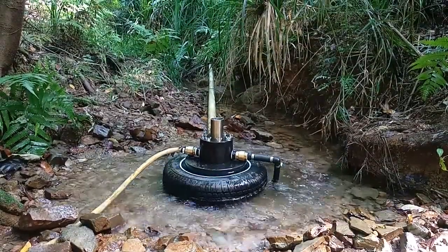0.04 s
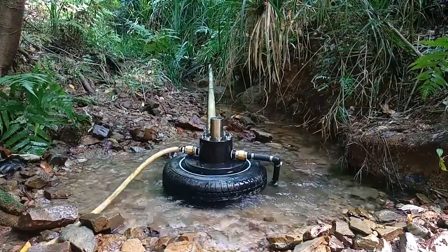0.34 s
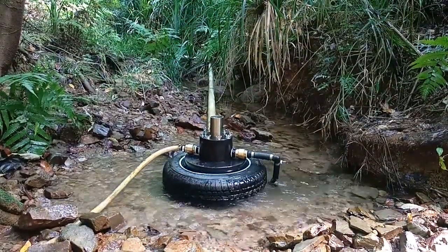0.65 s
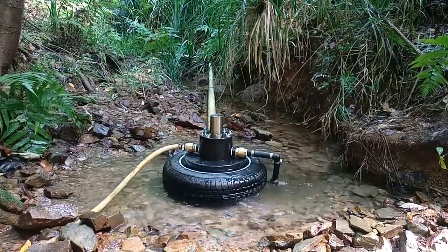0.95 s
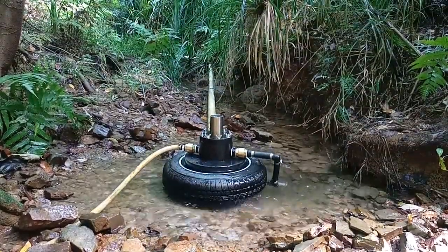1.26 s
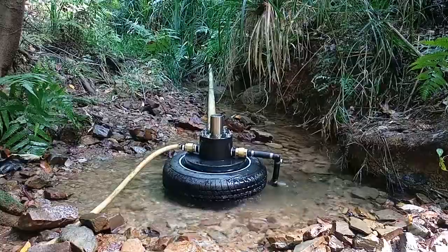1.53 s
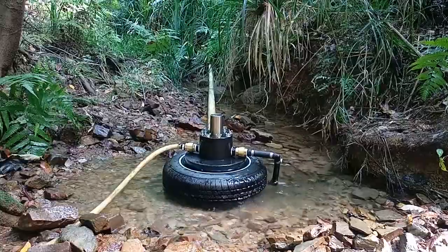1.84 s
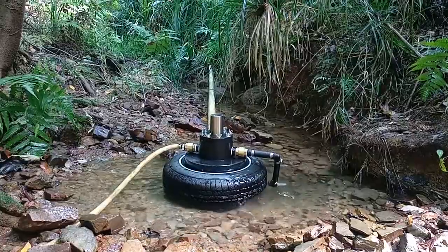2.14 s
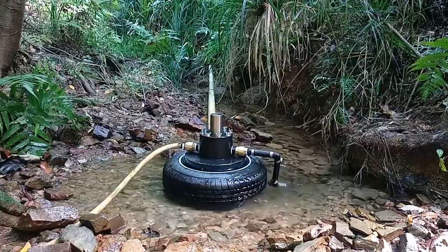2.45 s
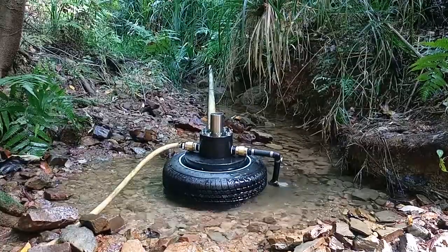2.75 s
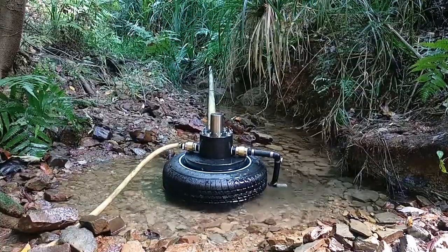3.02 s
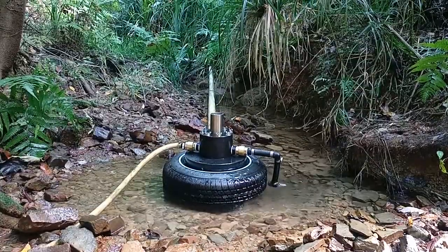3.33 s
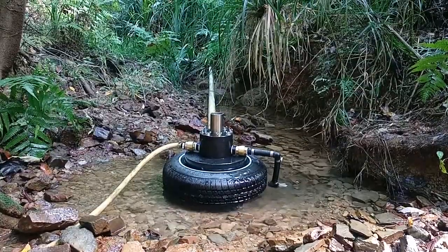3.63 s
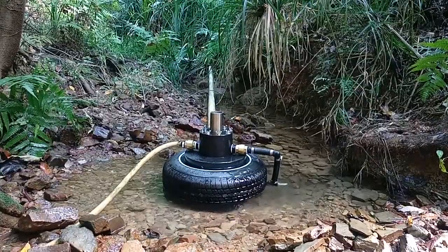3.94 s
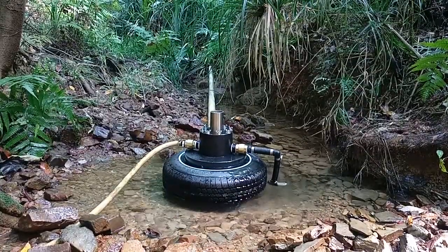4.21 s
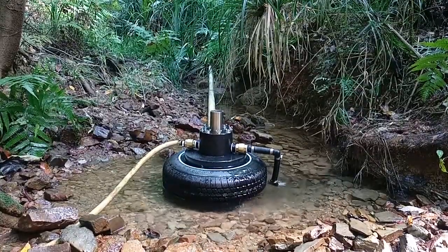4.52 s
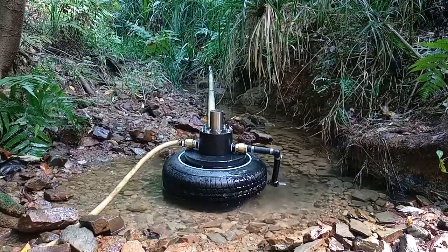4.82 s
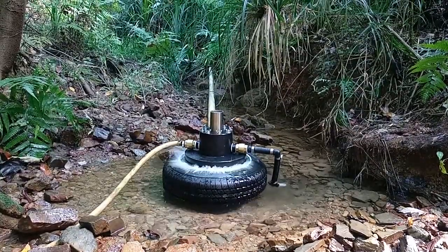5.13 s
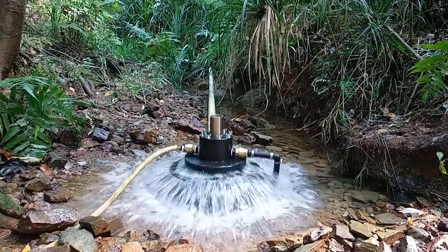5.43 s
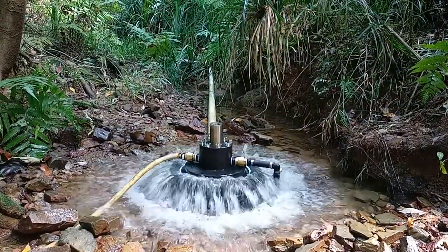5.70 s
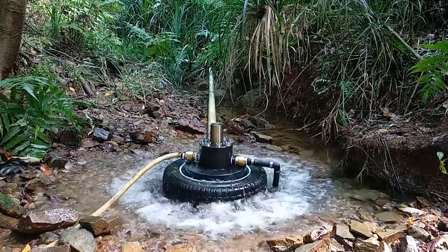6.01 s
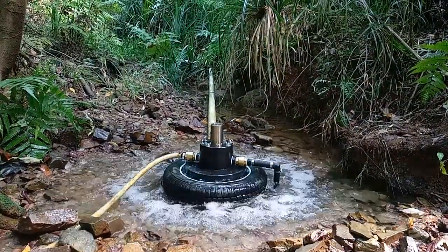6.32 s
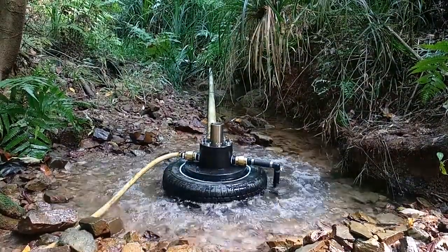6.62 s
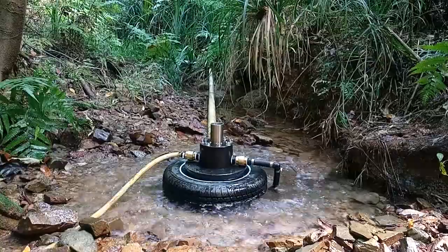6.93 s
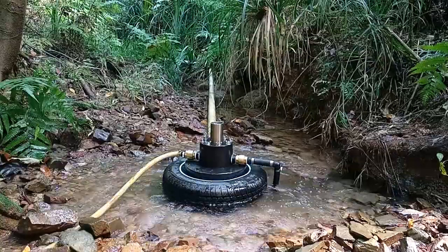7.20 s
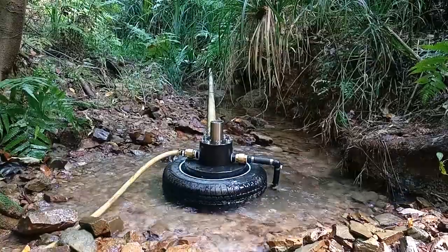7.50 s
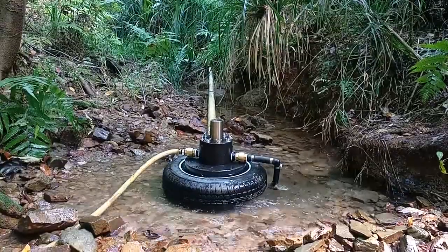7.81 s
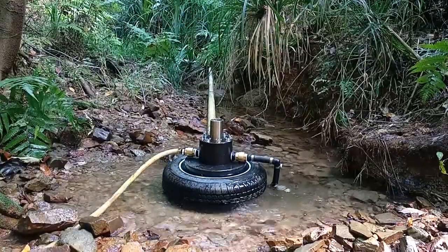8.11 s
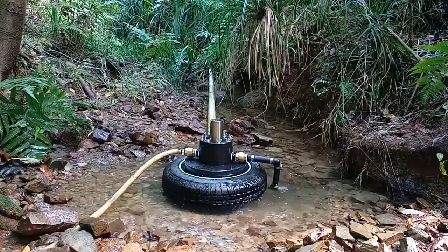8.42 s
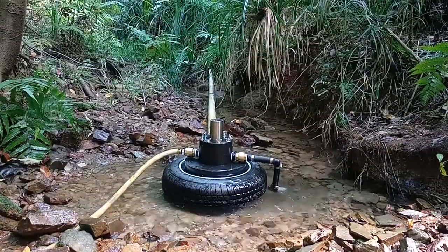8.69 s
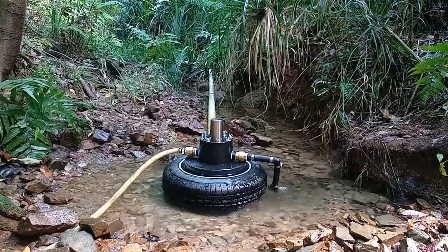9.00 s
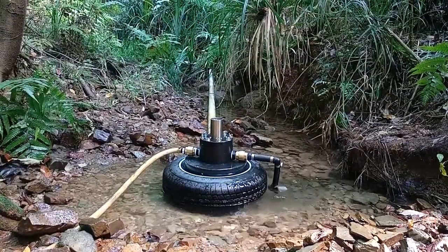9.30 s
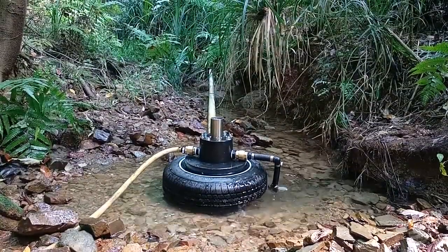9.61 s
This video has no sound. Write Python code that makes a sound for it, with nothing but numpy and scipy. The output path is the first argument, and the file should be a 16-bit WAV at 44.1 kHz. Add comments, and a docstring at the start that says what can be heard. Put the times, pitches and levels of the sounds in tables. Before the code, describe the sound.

A shallow forest creek trickles and gurgles softly, a little to the right, with small drips ticking close by. A faint, high cicada buzz fades in. About halfway through, a water-driven pump suddenly releases a loud rush of water that splashes into a pool for under a second. Bubbles and fizzing foam die away, leaving the trickle and two faint cicadas.

```python
"""Water-driven tyre pump in a forest creek

The valve opens once: a sheet of water bursts out, plunges into the pool, leaves fizzing foam.
Trapped air rings as rising sine tones; impacts and spray are shaped noise.
The shallow creek gurgles off to the right, drips tick close by, the banks echo.
Two cicadas start one after the other: pulsed noise through a body resonance."""
import sys
import numpy as np
from scipy import signal
from scipy.fft import rfft, irfft, next_fast_len
from scipy.io import wavfile
from scipy.ndimage import uniform_filter1d

SR = 44100
rng = np.random.default_rng(int(sys.argv[2]) if len(sys.argv) > 2 else 0)


def persist_wave(psi):
    """Save psi, clipped to +-1, as 16-bit WAV."""
    counts = np.round(np.clip(psi, -1, 1) * 32767).astype(np.int16)
    wavfile.write(sys.argv[1], SR, np.atleast_2d(counts).T)


N = 429975
TIME_S = np.arange(N) / SR
LEAK_S, OPEN_S, LAND_S, SHUT_S = 5.11, 5.209, 5.335, 5.99  # valve leaks, opens; sheet lands; valve shuts

# noise spectra: f/Hz, relative density/dB
SPLASH_SPECTRUM = [(300, -27.5), (480, -2), (580, -7.5), (740, -3), (980, -1), (1150, -3.5), (1390, -3),
                   (1680, -3), (1980, 0), (2900, -6.5), (3900, -5.5), (5800, -7.5), (6550, -5),
                   (8100, -22.5), (11000, -32)]
SPRAY_SPECTRUM = [(6000, -34), (8000, 2), (10000, 8.5), (13800, 6.5), (14800, 16), (16000, 3)]
CHURN_SPECTRUM = [(25, -26), (60, -41), (110, -14.5), (170, -6.5), (230, -1.5), (270, -2.5), (315, 3.5),
                  (400, -4.5), (485, 3), (560, -9.5), (900, -29)]
FOAM_SPECTRUM = [(600, -18), (1500, 5.5), (2500, -2), (4000, 0.5), (6600, 3), (8000, -13), (10500, -8),
                 (13800, -10.5), (15000, -2.5)]
WASH_SPECTRUM = [(25, -26), (90, -4.5), (220, -8), (330, -5.5), (450, -14), (620, -4.5), (1100, 5.5),
                 (1900, 2.5), (2800, -4.5), (5000, -4), (6800, 1.5), (8000, -18.5), (13800, -27),
                 (15200, -15.5)]
# stereo balance: f/Hz, L-R/dB
PUMP_PAN = [(200, -0.5), (1300, 1.5), (1700, 0), (2400, 3), (3500, 3), (4300, 0), (6800, -3), (8500, -1),
            (10500, 9.5), (15000, 7)]
CREEK_PAN = [(200, 0), (700, -6), (1200, 0), (1700, -8.5), (2900, 0), (4100, -8.5), (5800, -9),
             (7000, -16.5), (9000, -3), (12500, 8.5), (15000, 1)]
# stereo likeness: f/Hz, L-R correlation
PUMP_CORRELATION = [(60, 0.79), (200, 0.99), (700, 0.72), (1400, 0.36), (2000, 0.06), (2700, -0.57),
                    (4000, 0.074), (8000, -0.13)]
CREEK_CORRELATION = [(60, 0.12), (200, 0.24), (450, 0.42), (1000, 0.22), (1500, 1), (2200, 0.039),
                     (5000, 0.042)]
# surges of the sheet: t/s, splash gain/dB, churn gain/dB, half-length/s
SHEET_SURGES = [(5.36, -0.5, 7, .042), (5.434, 4.5, -7, 0.03), (5.787, -1, 6.5, 0.027)]
# big air pockets dragged under: t/s, relative level/dB, f/Hz, t60/s
AIR_POCKETS = [(5.313, -29, 400, 0.082), (5.332, -26, 324, 0.16), (5.352, -24, 494, 0.059),
               (5.36, -41.5, 82, 0.26), (5.382, -25, 310, 0.084), (5.392, -27, 196, 0.092),
               (5.574, -26.5, 228, 0.32), (5.775, -35, 109, 0.039)]
# water lumps hitting the pool: t/s, relative level/dB, f/Hz
LUMP_SLAPS = [(5.213, -29, 1090), (5.2773, -19.5, 3400), (5.3146, -13, 2230), (5.332, -13.5, 3770),
              (5.3428, -12, 3830), (5.389, -19.5, 1860), (5.5465, -20, 1380), (5.843, -15, 2100),
              (5.872, -20, 1360)]
# froth of the previous stroke and this one: formed/s, level/dB, thins from/s, decay/(dB/s)
FROTH_STAGES = [(0, -56, 0.5, 57), (6.0, -49, 6.38, 8.5)]
# creek bubble and droplet strength: f/Hz, relative level/dB
BUBBLE_LEVELS = [(560, 3.5), (700, -7), (1050, 1), (1900, 5), (2800, 3.5), (4500, -13), (6500, -13),
                 (7500, -14.5)]
DROPLET_LEVELS = [(2500, -6.5), (4500, 2), (6700, 6), (8000, -23), (13800, -0.5), (15000, -29)]
# loudest bubbles (the creek's, and the pool's after the discharge), close drips: t/s, relative level/dB, f/Hz,
# L-R/dB
LOUD_PLOPS = [(0.089, -38.5, 1910, -7), (0.435, -45, 1900, 14), (1.23, -46, 896, -4),
              (1.925, -49.5, 800, 2), (2.209, -45.5, 964, -5), (2.536, -41, 1790, -5),
              (2.621, -41, 1600, -5), (2.954, -37, 1980, -0.5), (3.138, -45, 1080, -7),
              (3.439, -50, 654, -4), (3.482, -39.5, 1860, -6), (3.992, -40.5, 987, -1),
              (4.018, -38, 1710, -7), (4.584, -40, 1485, 0), (6.093, -33, 1410, 19), (6.22, -32.5, 3480, 6),
              (6.255, -37, 2000, 0), (6.701, -36.5, 2390, 0), (6.92, -38.5, 2320, 2),
              (7.91, -45.5, 707, -4), (8.028, -40.5, 780, -5), (8.873, -42, 2200, 1),
              (9.192, -39.5, 1050, -5), (9.237, -46, 633, -2.5), (9.288, -36.5, 3420, 8),
              (9.56, -41, 1970, 1)]
CLOSE_DRIPS = [(.3047, -22, 5320, -20), (1.392, -36.5, 5900, -21), (3.8586, -41, 15000, 7),
               (4.3974, -40, 13500, 14), (4.5686, -36.5, 5200, -17), (6.1275, -32.5, 6100, -1),
               (7.992, -37, 4000, -16), (8.136, -35.5, 5100, -24), (8.6033, -42, 14800, 11),
               (9.4036, -33, 5360, -19)]
# cicada body resonances: f/Hz, relative density/dB
CICADA_BODY_1 = [(6800, -19), (7800, -2), (8300, -5.5), (8650, -1.5), (9050, -2), (9500, -9), (10000, -18),
                 (11500, -26.5)]
CICADA_BODY_2 = [(6800, -34), (7450, -5), (7850, -4.5), (8550, -1), (9350, -8), (9900, -15), (11500, -40)]
# echo decay of banks and trees: f/Hz, t60/s
BANK_DECAY = [(200, 0.1), (1500, 0.24), (5000, 0.2), (15000, 0.035)]


def discharge(splash_db=2.5, churn_db=-36, spray_db=-11, gap_hz=1040, halving_s=0.024):
    """The sheet breaks into drops and churns the pool; the rush deepens as the valve opens."""
    strength = flow()
    sheet = seething(patchy_db=2, frame=384) + 0.64 * patter(per_s=500, spread_db=3, burst_s=0.002)
    splash = strength * colour(sheet, SPLASH_SPECTRUM, PUMP_PAN, PUMP_CORRELATION, lag_ms=-0.05)
    stirring = swell(LAND_S, SHUT_S + 0.055, rise_db_per_s=207, fall_db_per_s=220, sag_db_per_s=12.5)
    rumble = colour(rng.standard_normal((2, N)), CHURN_SPECTRUM, PUMP_PAN, PUMP_CORRELATION)
    churn = stirring * surging(column=2) * rumble
    mist = rng.standard_normal((2, N)) + patter(per_s=1100, spread_db=2.5, burst_s=0.0006)
    spray = strength * np.sqrt(surging(column=1)) * colour(mist, SPRAY_SPECTRUM, PUMP_PAN)
    hz, t, bins = signal.stft(gain_of(splash_db) * splash + gain_of(spray_db) * spray, SR, nperseg=512)
    # a narrow gap sheds only small, high bubbles
    cutoff_hz = gap_hz * 2 ** -np.maximum((t - OPEN_S) / halving_s, -1)
    attenuation = np.sqrt(1 + (cutoff_hz / (hz[:, None] + 1)) ** 5)
    jet = signal.istft(bins / attenuation, SR)[1][:, :N]
    return jet + gain_of(churn_db) * churn


def flow(leak_db=-49, jet_db=-32, sheet_db=-30):
    """Rush envelope: leak, first jet, then the sheet, weakening as pressure drains."""
    leak = gain_of(leak_db) * swell(LEAK_S, LEAK_S, rise_db_per_s=95, fall_db_per_s=75)
    jet = gain_of(jet_db) * swell(OPEN_S, OPEN_S, rise_db_per_s=586, fall_db_per_s=51)
    sheet = gain_of(sheet_db) * swell(LAND_S, SHUT_S, rise_db_per_s=253, fall_db_per_s=103,
                                      sag_db_per_s=5.5)
    return np.sqrt(leak ** 2 + jet ** 2 + sheet ** 2) * surging(column=1)


def surging(column):
    """The sheet falls in surges: Gaussian bumps from one dB column."""
    return gain_of(sum(row[column] * np.exp(-((TIME_S - row[0]) / row[3]) ** 2) for row in SHEET_SURGES))


def plunge(gulp_db=-3, slap_db=-4, splat_db=-5, lump_db=-28.5, glide=0.016, count=22):
    """Lumps of water slap the pool and drag big air pockets under."""
    out = np.zeros((2, N))
    for at_s, level_db, hz, t60_s in AIR_POCKETS:
        add(out, at_s, gain_of(level_db + gulp_db) * bubble(hz, t60_s, glide))
    for at_s, level_db, hz in LUMP_SLAPS:
        add(out, at_s, gain_of(level_db + slap_db) * bubble(hz, t60_s=16 / hz, glide=glide))
        add(out, at_s, gain_of(level_db + splat_db) * splat(hz, t60_s=0.056, width_oct=0.88))
    for k, (when, pitch) in enumerate(rng.random((count, 2))):  # smaller lumps
        at_s = LAND_S + (k + when) / count * (SHUT_S - LAND_S)
        hz = 652 * 2 ** (1.9 * pitch)
        add(out, at_s, gain_of(lump_db) * bubble(hz, t60_s=36 / hz, glide=glide))
    return out


def boil(gain_db=-36, start_s=5.4, length_s=1.4, peak_s=5.64, spread_db=4, cycles=34, count=230):
    """The sheet beats bubbles into the pool, which gurgles on as it settles."""
    out = np.zeros((2, N))
    for when, pitch, rank, side in rng.random((count, 4)):
        hz = 680 * 4 ** pitch ** 1.1
        ring = bubble(hz, cycles / hz, glide=0.066, side_db=5 + 11 * (side - 0.5),
                      lag_ms=0.14 * (side - 0.7))
        add(out, start_s + when * length_s, gain_of(-spread_db * np.log(rank + 0.076)) * ring)
    return gain_of(gain_db) * swell(peak_s, peak_s, rise_db_per_s=40, fall_db_per_s=32.5) * out


def foam():
    """Froth left by each stroke bursts and thins out."""
    bursts = patter(per_s=1100, spread_db=4.5, burst_s=0.0004) + 2 * seething(patchy_db=5)
    amount = sum(gain_of(level_db) * swell(formed_s, thins_s, rise_db_per_s=18, fall_db_per_s=decay)
                 for formed_s, level_db, thins_s, decay in FROTH_STAGES)
    return amount * colour(bursts, FOAM_SPECTRUM, PUMP_PAN)


def babble(rms_db=-62, spread_db=6.5, glide=0.063, scatter_s=0.035, lag_ms=0.38, count=470):
    """Water folding over stones sheds clusters of like-sized bubbles."""
    out = np.zeros((2, N))
    for k, (when, pitch) in enumerate(rng.random((count, 2))):
        at_s = (k + when) / count * N / SR
        for delay, detune, strength, stray, damping in rng.standard_normal((3, 5)):
            hz = 575 * (5000 / 575) ** abs(pitch + 0.07 * detune)
            t60_s = 0.038 * (1000 / hz) ** 0.75 * np.exp(0.3 * damping)
            level_db = lookup(BUBBLE_LEVELS, hz) + spread_db * min(strength, 1.5)
            ring = bubble(hz, t60_s, glide, lookup(CREEK_PAN, hz) + 2 * stray, lag_ms + 0.12 * stray)
            add(out, at_s + scatter_s * delay, gain_of(level_db) * ring)
    return gain_of(rms_db) * evened(out)


def plops(ring_db=-1, splat_db=-7, brood_db=-10, brood_s=0.02, cycles=42, glide=0.054, lag_ms=0.38,
          count=40):
    """A wavelet collapses with a splat, traps one large bubble, sheds three lesser ones."""
    out, quiet_plops = np.zeros((2, N)), []
    for k, (when, pitch) in enumerate(rng.random((count, 2))):
        at_s = (k + when) / count * N / SR
        octaves = 1.997 * pitch
        hz = 724 * 2 ** octaves
        quiet_plops.append((at_s, -50.5 + 3.5 * octaves, hz, lookup(CREEK_PAN, hz)))
    for at_s, level_db, hz, side_db in quiet_plops + LOUD_PLOPS:
        add(out, at_s, gain_of(level_db + ring_db) * bubble(hz, cycles / hz, glide, side_db, lag_ms))
        collapse = splat(hz * 1.28, t60_s=0.028, width_oct=0.41, side_db=side_db)
        add(out, at_s, gain_of(level_db + splat_db) * collapse)
        for delay, detune in rng.standard_normal((3, 2)):
            brood_hz = max(hz * np.exp(0.3 * detune), 640)
            ring = bubble(brood_hz, cycles / brood_hz, glide, side_db, lag_ms)
            add(out, at_s + brood_s * (0.5 + abs(delay)), gain_of(level_db + brood_db) * ring)
    return out


def drips(tick_db=-3, cycles=15, glide=0.039):
    """Drops land close by: a tick and a short, high ring."""
    out = np.zeros((2, N))
    for at_s, level_db, hz, side_db in CLOSE_DRIPS:
        add(out, at_s, gain_of(level_db) * bubble(hz, cycles / hz, glide * (hz < 10000), side_db))
        tick = splat(hz, t60_s=0.014, width_oct=0.3, side_db=side_db)
        add(out, at_s, gain_of(level_db + tick_db) * tick)
    return out


def spatter(gain_db=-51.5, spread_db=3, count=640):
    """The nearest riffle flicks tiny drops, each ticking at its own pitch."""
    out = np.zeros((2, N))
    for when, pitch, rank in rng.random((count, 3)):
        hz = 3500 * (15000 / 3500) ** pitch ** 1.4
        level_db = gain_db + lookup(DROPLET_LEVELS, hz) - spread_db * np.log(0.05 + rank)
        tick = splat(hz, t60_s=0.011, width_oct=0.32, side_db=lookup(CREEK_PAN, hz))
        add(out, when * N / SR, gain_of(level_db) * tick)
    return out


def wash(rms_db=-54):
    """Blended trickle of the creek further off."""
    trickle = seething(patchy_db=2.5, frame=768)
    return gain_of(rms_db) * colour(trickle, WASH_SPECTRUM, CREEK_PAN, CREEK_CORRELATION, lag_ms=0.38)


def cicada(body, start_s, warm_up_s, full_db, pulse_hz, depth, side_db):
    """Tymbal clicks, blurred by the forest, buzz in the hollow body."""
    age_s = np.maximum(TIME_S - start_s, 0)
    envelope = gain_of(full_db) * (1 - np.exp(-age_s / warm_up_s)) ** 2
    drift = evened(uniform_filter1d(rng.standard_normal(N), size=20000))
    turns = np.cumsum(pulse_hz * (1 + 0.0056 * drift)) / SR
    buzz = rng.standard_normal((2, N)) * (1 + depth * np.cos(2 * np.pi * turns))
    return envelope * panned(side_db) * colour(buzz, body)


def bank_echo(x, gain_db=-7.5, taps_per_s=2500):
    """Sparse echoes off earth banks and trunks; each band decays at its own rate."""
    taps = rng.choice([-1., 1.], (2, SR // 2)) * (rng.random((2, SR // 2)) < taps_per_s / SR)
    hz, t, bins = signal.stft(taps, SR, nperseg=256)
    decay = gain_of(-60 * t / lookup(BANK_DECAY, hz)[:, None])
    tail = signal.istft(bins * decay, SR)[1]
    return gain_of(gain_db) * signal.oaconvolve(x, tail / np.linalg.norm(tail[0]), axes=1)[:, :N]


def bubble(hz, t60_s, glide, side_db=0., lag_ms=0.):
    """An air pocket rings, rising in pitch as it nears the surface; left lags by lag_ms."""
    delay_s = np.array([[lag_ms], [0]]) * 1e-3
    t = np.maximum(np.arange(int(t60_s * SR) + 40) / SR - delay_s, 0)
    envelope = (1 - np.exp(-t * hz)) * gain_of(-60 * t / t60_s)
    tone = np.sin(2 * np.pi * hz * t * (1 + glide * t / t60_s))
    return panned(side_db) * envelope / envelope.max() * tone


def splat(hz, t60_s, width_oct, side_db=0.):
    """Water strikes water: a noise burst around one pitch."""
    t = np.arange(2048) / SR
    burst = rng.standard_normal((2, len(t))) * gain_of(-60 * t / t60_s)
    octaves = np.log2((np.fft.rfftfreq(len(t), 1 / SR) + 1) / hz)
    band = np.exp(-(octaves / width_oct) ** 2)
    burst = irfft(rfft(np.roll(burst, 30, axis=1)) * band)
    return panned(side_db) * burst / abs(burst).max()


def patter(per_s, spread_db, burst_s):
    """Drops shatter at random in tiny bursts, a few much larger than the rest."""
    sizes = gain_of(spread_db * np.minimum(rng.exponential(1, N), 5))
    hits = sizes * (rng.random(N) < per_s / SR)
    power = signal.lfilter([1], [1, -np.exp(-1 / (burst_s * SR))], hits ** 2 + 1e-12)
    return evened(np.sqrt(power) * rng.standard_normal((2, N)))


def seething(patchy_db, frame=256):
    """Noise swelling in time-pitch patches; longer frames are more tonal."""
    bins = signal.stft(rng.standard_normal((2, N)), nperseg=frame)[2]
    patches = uniform_filter1d(rng.standard_normal(bins.shape[1:]), size=4, axis=0)
    patches = evened(uniform_filter1d(patches, size=3, axis=1))
    return evened(signal.istft(bins * gain_of(patchy_db * patches))[1][:, :N])


def colour(x, spectrum, pan=None, correlation=None, lag_ms=0):
    """Spectrum and direction for two unrelated channels; rms 1."""
    size = next_fast_len(N, real=True)
    hz, bins = np.fft.rfftfreq(size, 1 / SR), rfft(x, size)
    if correlation:
        shared = np.clip(lookup(correlation, hz), -1, 1)
        left = shared * bins[1] + np.sqrt(1 - shared ** 2) * bins[0]
        bins[0] = left * np.exp(-2j * np.pi * hz * lag_ms * 1e-3)
    if pan:
        bins = bins * panned(lookup(pan, hz))
    return evened(irfft(bins * gain_of(lookup(spectrum, hz)), size)[:, :N])


def swell(full_s, end_s, rise_db_per_s, fall_db_per_s, sag_db_per_s=0):
    """Envelope: attack to full_s, sagging hold, release from end_s."""
    before_s, held_s, after_s = np.maximum([full_s - TIME_S, TIME_S - full_s, TIME_S - end_s], 0)
    return gain_of(-rise_db_per_s * before_s - sag_db_per_s * held_s - fall_db_per_s * after_s)


def panned(side_db):
    """Constant-power gains from L-R in dB."""
    pair = gain_of(np.array([side_db, -side_db]).reshape(2, -1) / 2)
    return pair / np.sqrt((pair ** 2).mean(0))


def lookup(table, hz):
    """Interpolation over log frequency."""
    knots_hz, values = np.transpose(table)
    return np.interp(np.log(hz + 1), np.log(knots_hz + 1), values)


def add(mix, at_s, sound):
    part = mix[:, max(round(at_s * SR), 0):][:, :sound.shape[1]]
    part += sound[:, :part.shape[1]]


def gain_of(db):
    return 10 ** (np.asarray(db) / 20)


def evened(x):
    """Scaled to rms 1."""
    return x / np.sqrt(np.mean(x ** 2) + 1e-20)


def scene():
    """Pump, creek and cicadas; only single bubbles and drops echo."""
    water = babble() + plops() + spatter() + drips() + plunge() + boil()
    cicadas = cicada(CICADA_BODY_1, start_s=3.01, warm_up_s=0.62, full_db=-55.5,
                     pulse_hz=207, depth=0.11, side_db=-1)
    cicadas += cicada(CICADA_BODY_2, start_s=5.3, warm_up_s=0.5, full_db=-52.6,
                      pulse_hz=106, depth=0.2, side_db=-4.5)
    return water + bank_echo(water) + wash() + discharge() + foam() + cicadas


def record(dry):
    """Steep low-pass."""
    cutoff_hz = 15950
    lowpass = signal.firwin(511, cutoff_hz, window=("kaiser", 9), fs=SR)
    return signal.oaconvolve(dry, lowpass[None], "same")


dry = scene()
out = record(dry)
persist_wave(out)
```